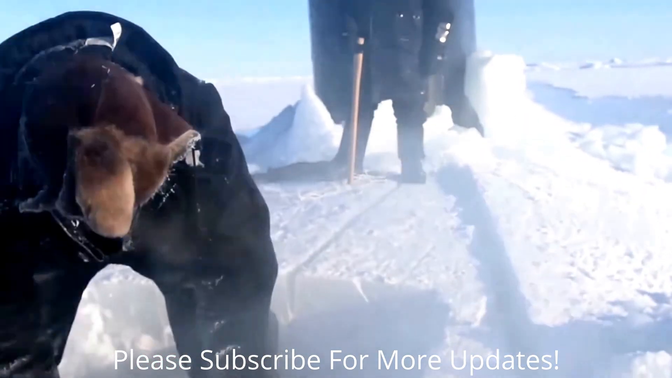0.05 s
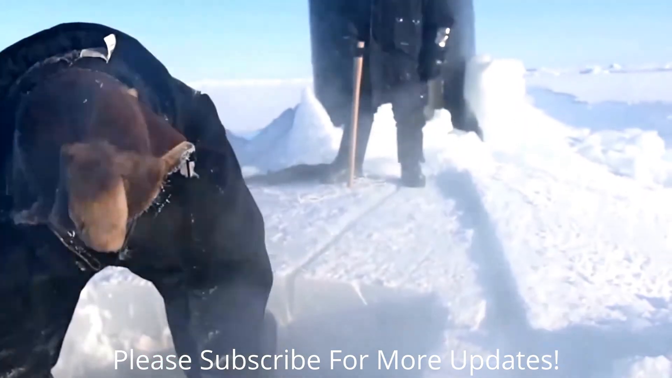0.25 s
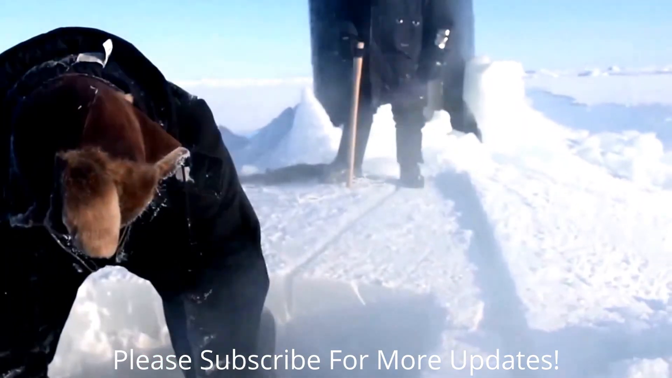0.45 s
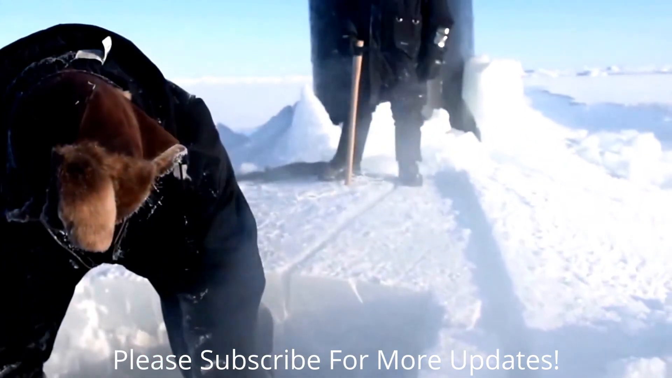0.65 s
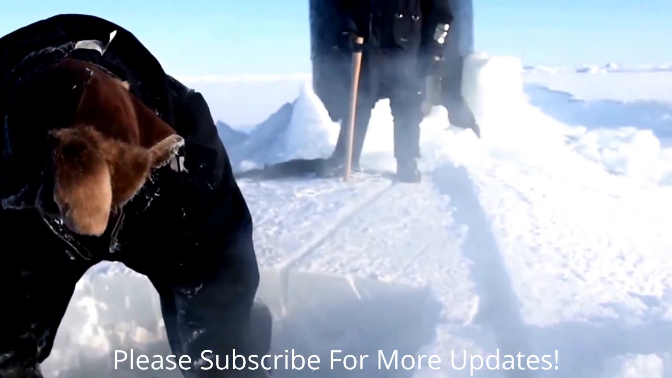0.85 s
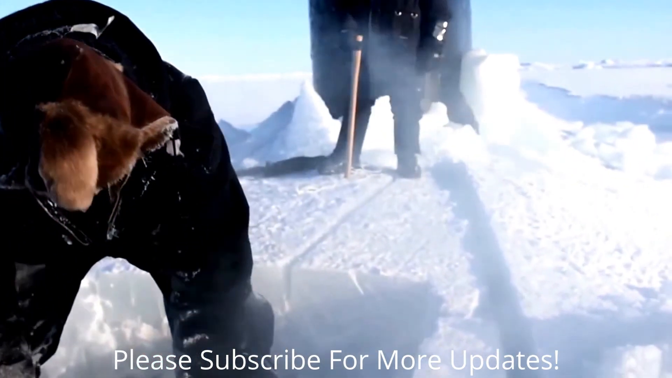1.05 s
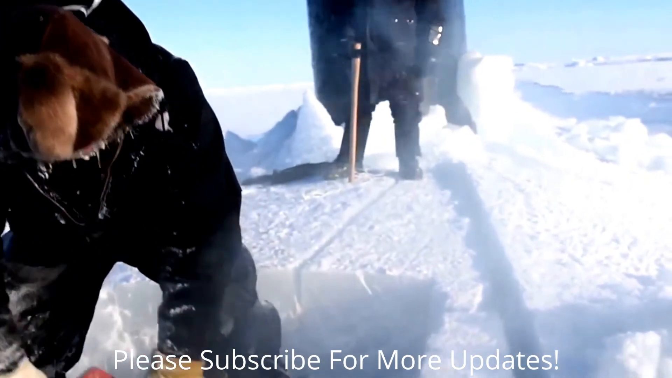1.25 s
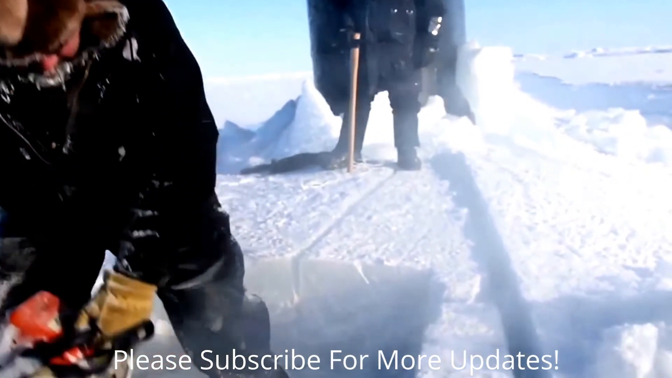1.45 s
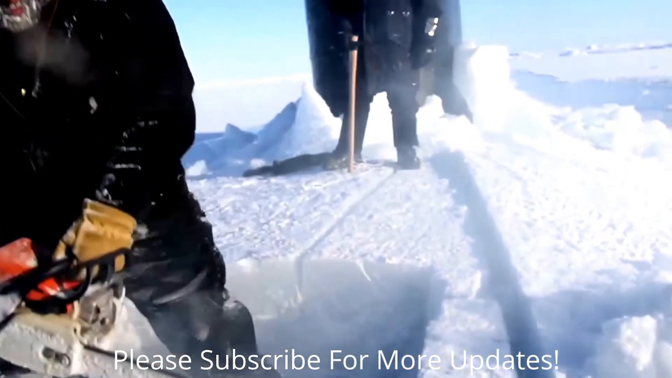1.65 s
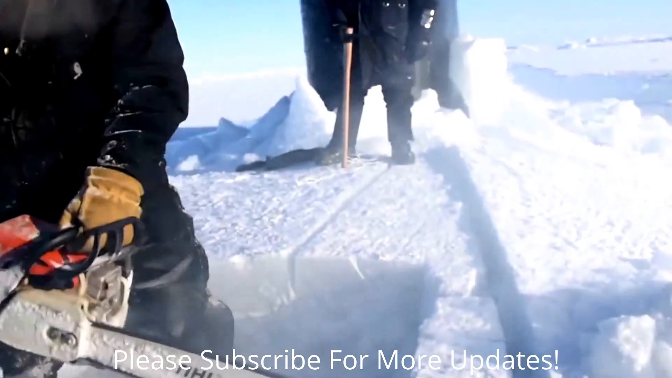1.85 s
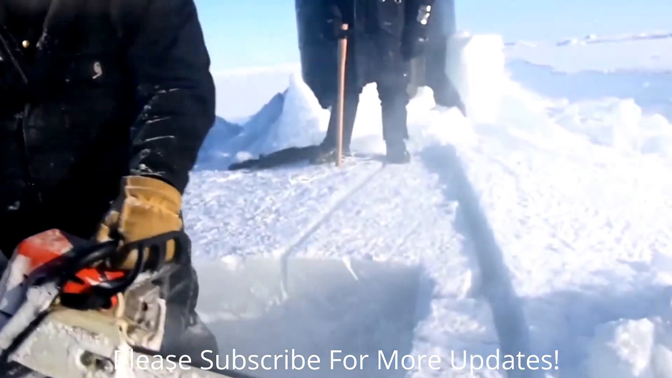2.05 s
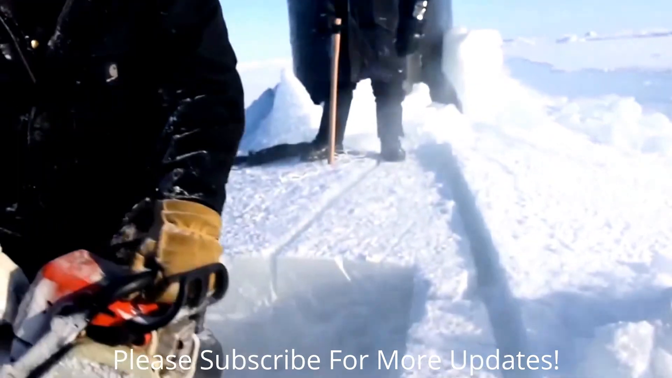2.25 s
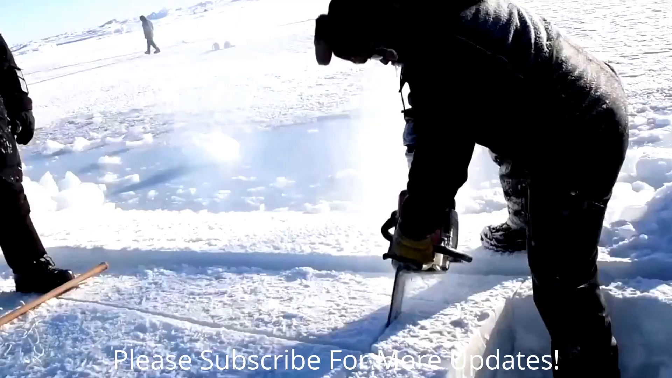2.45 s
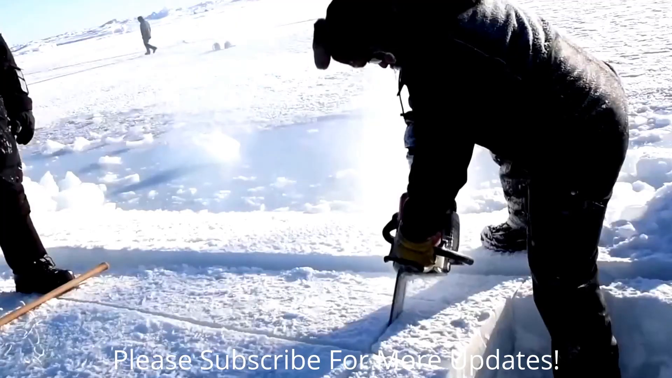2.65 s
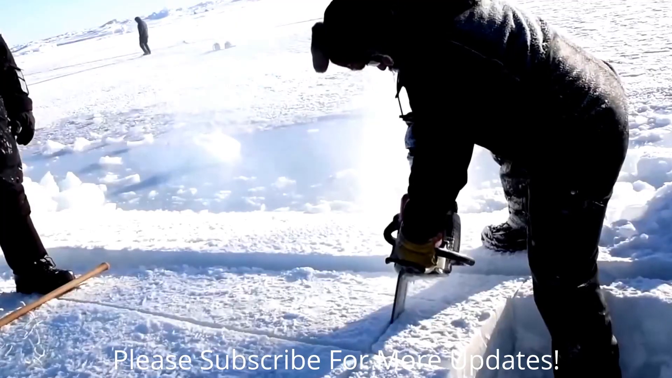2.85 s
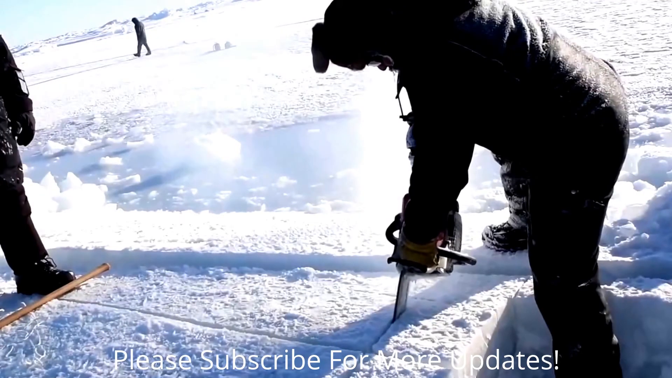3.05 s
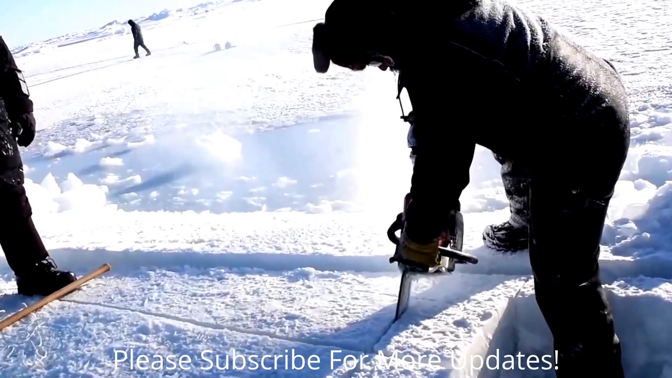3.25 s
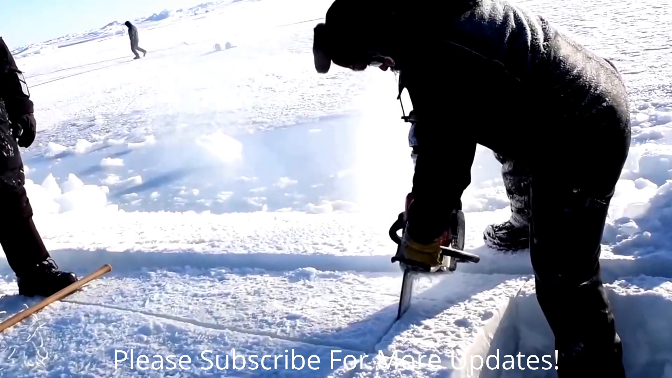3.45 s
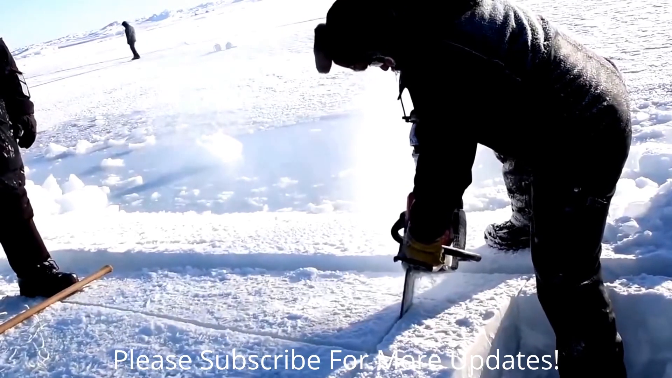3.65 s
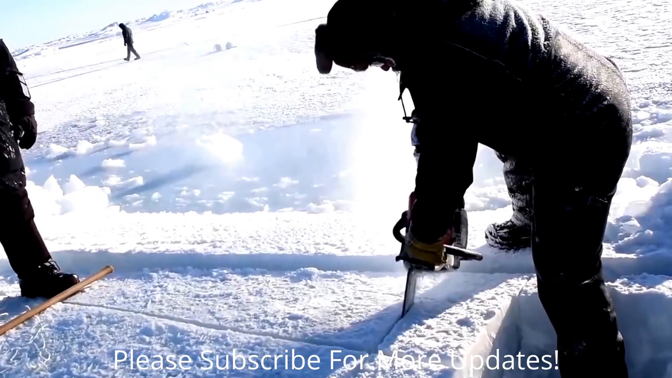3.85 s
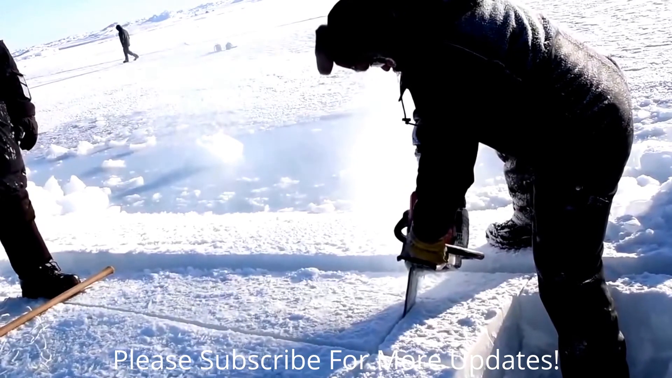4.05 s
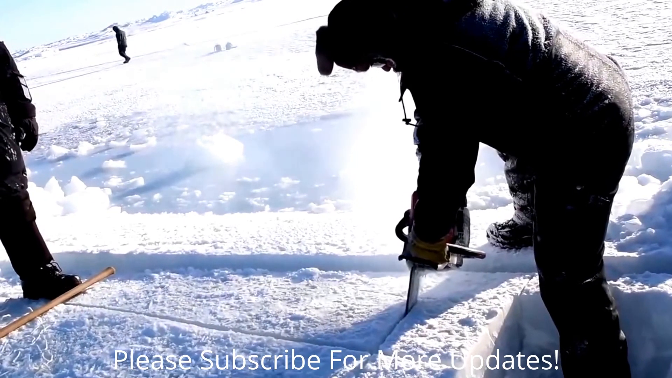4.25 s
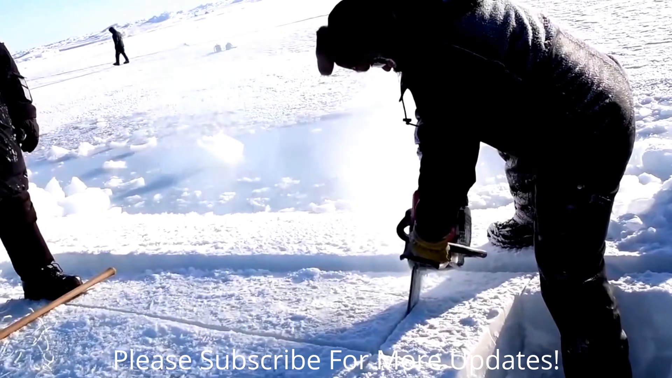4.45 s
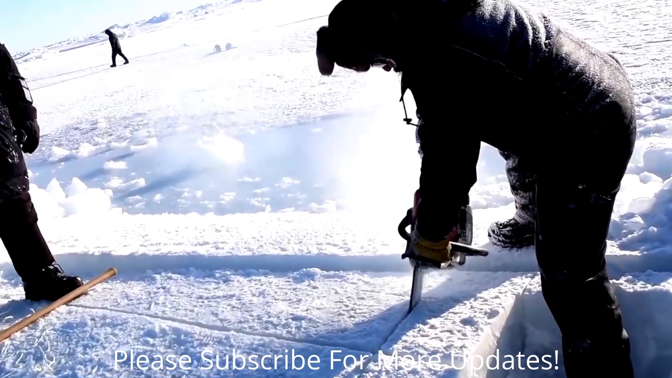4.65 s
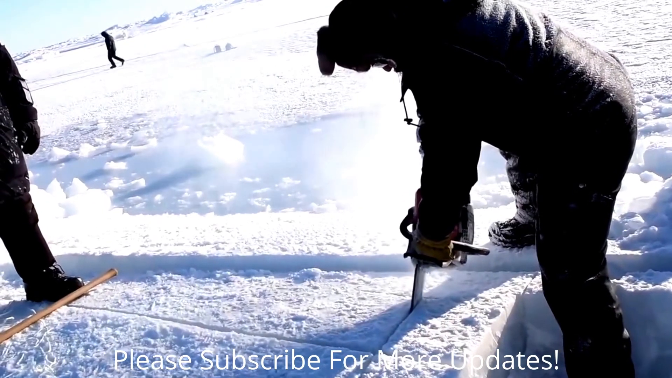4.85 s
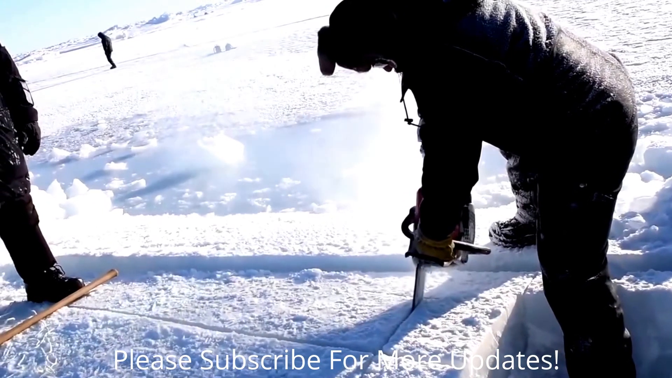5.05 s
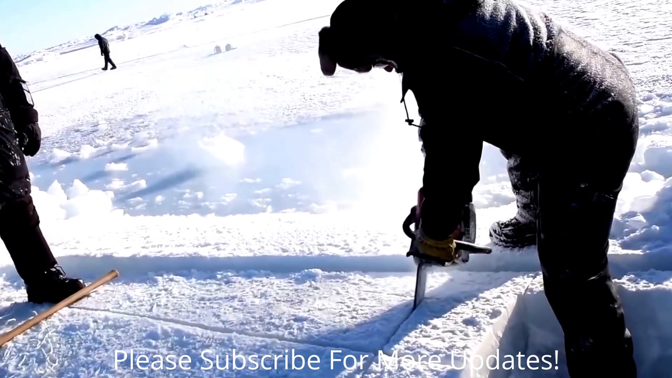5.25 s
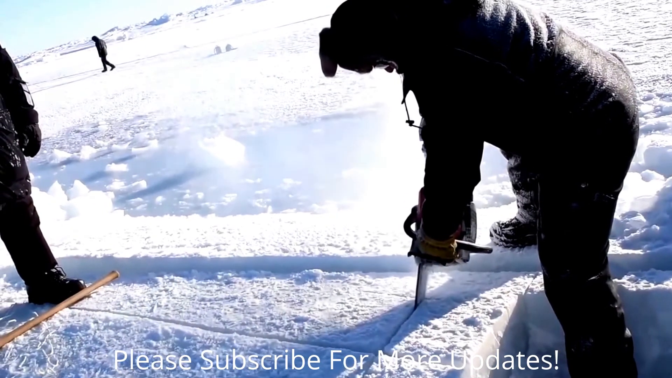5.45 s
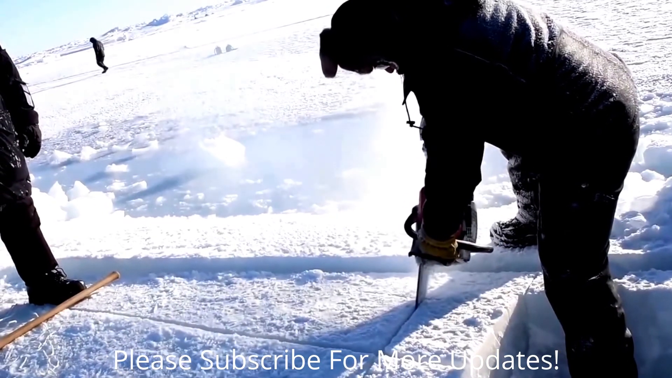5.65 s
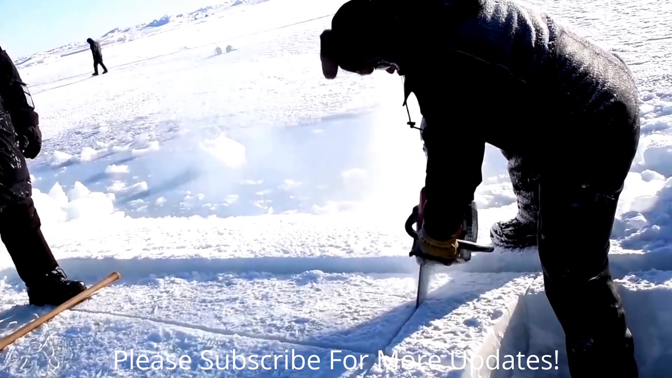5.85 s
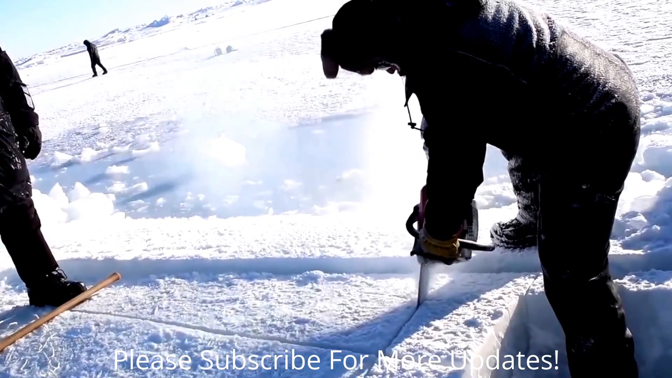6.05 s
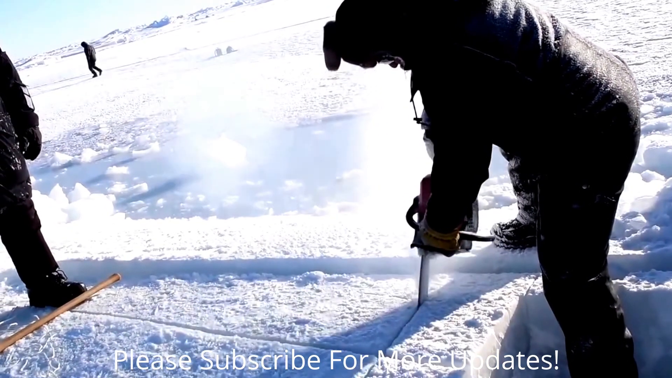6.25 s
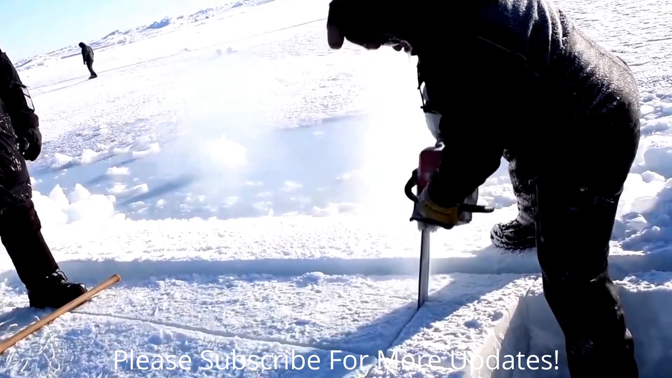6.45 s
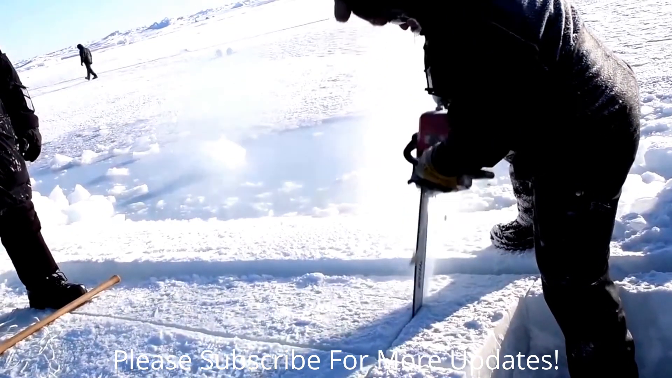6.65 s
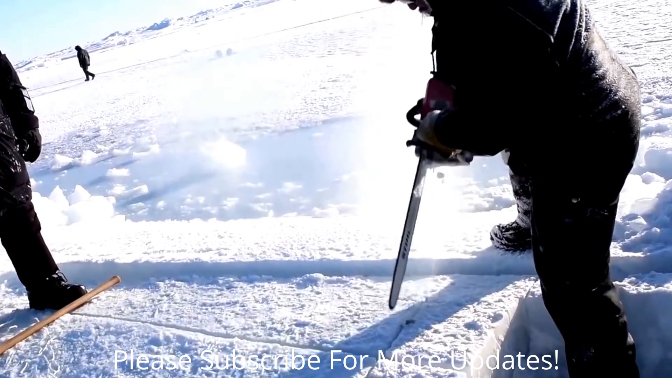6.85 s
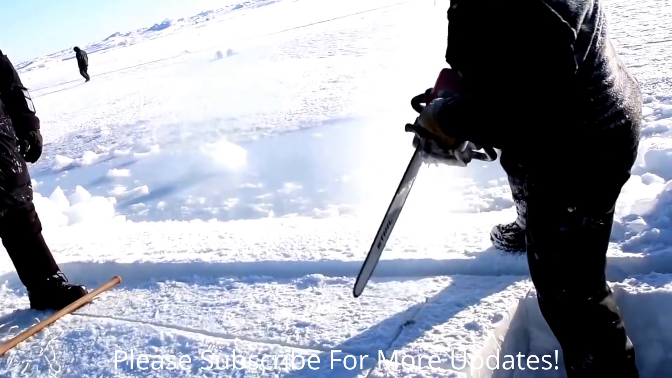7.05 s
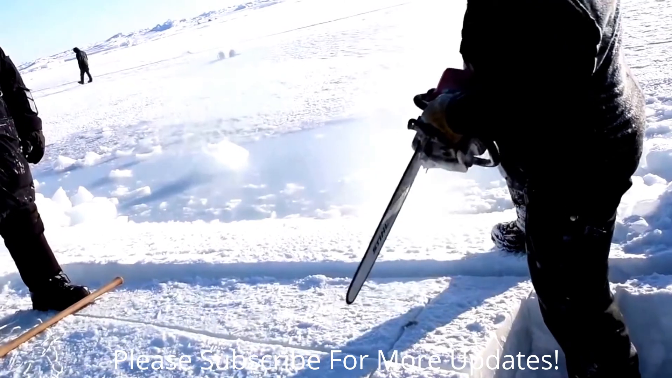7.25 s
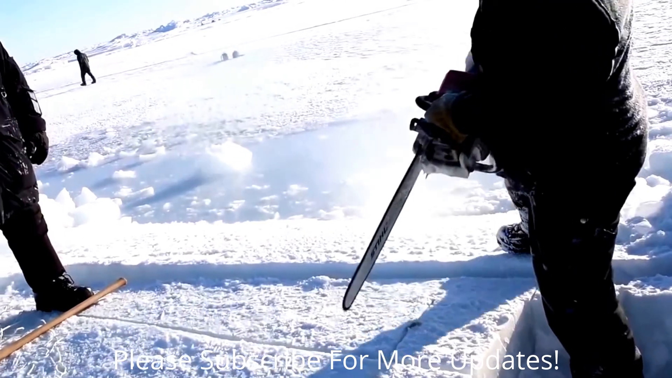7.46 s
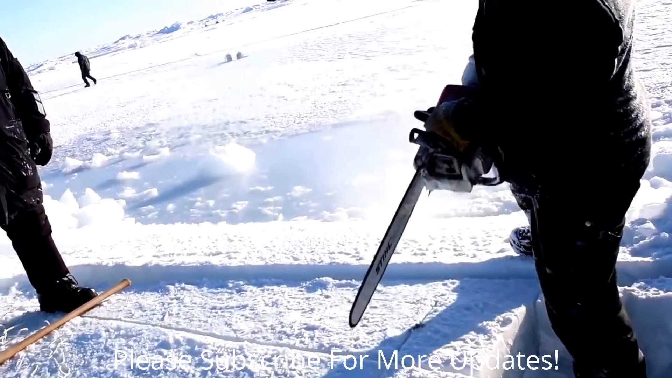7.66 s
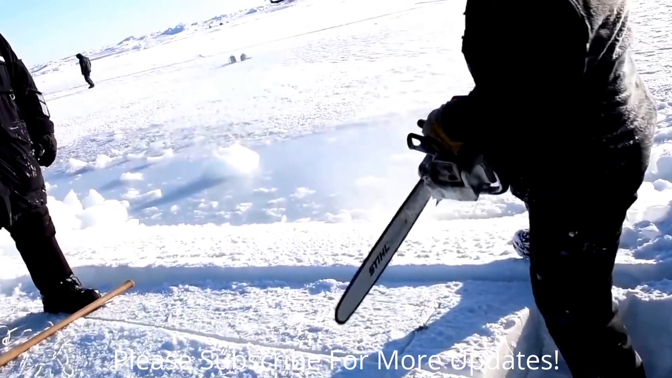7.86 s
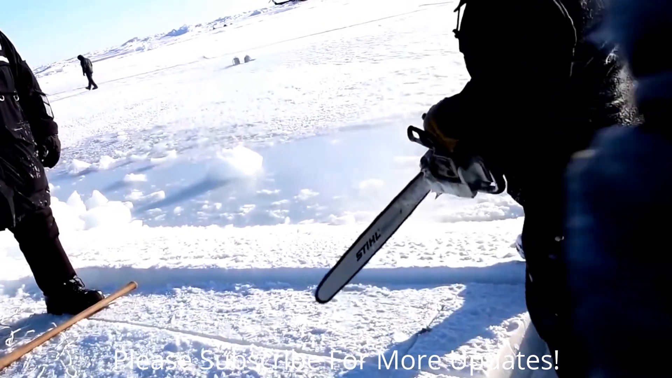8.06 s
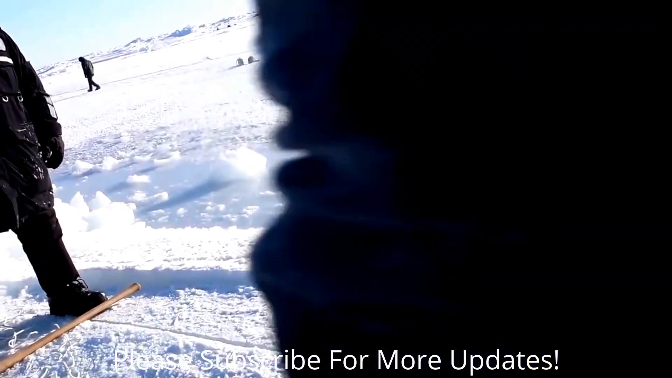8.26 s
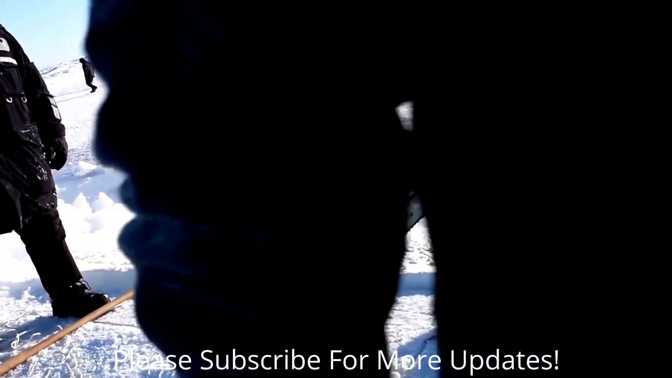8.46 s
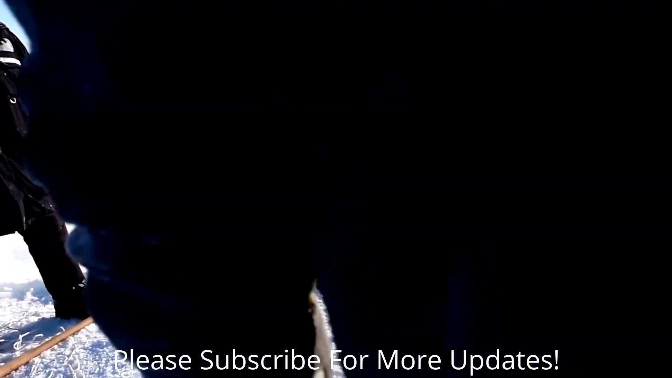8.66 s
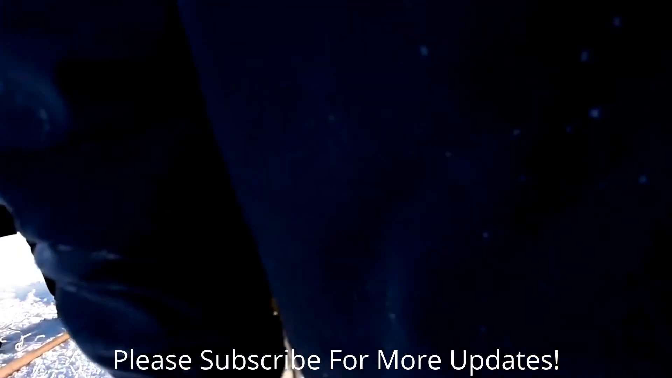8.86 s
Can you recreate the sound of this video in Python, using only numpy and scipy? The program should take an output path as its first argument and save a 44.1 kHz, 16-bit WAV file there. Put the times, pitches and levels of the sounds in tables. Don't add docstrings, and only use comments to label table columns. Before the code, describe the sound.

A chainsaw roars close by cutting ice, jumps slightly farther off, then lifts free, its whine falling to a rattling idle.

```python
import sys
import numpy as np
from scipy import signal
from scipy.fft import rfft, irfft, next_fast_len
from scipy.io import wavfile
from scipy.ndimage import uniform_filter1d

SR = 44100
rng = np.random.default_rng(int(sys.argv[2]) if len(sys.argv) > 2 else 0)


def amp(db):
    return 10 ** (np.asarray(db, float) / 20)


def write(x):
    x = np.atleast_2d(x).T
    wavfile.write(sys.argv[1], SR, np.round(np.clip(x, -1, 1) * 32767).astype(np.int16))


N = 392490

CUT_S, SHADED_S = 2.402, 8.08
SHUT_S, COAST_HZ, COAST_TAU_S, IDLE_HZ = 6.8, 188.7, 0.95, 55.5
SHUT_EXHAUST_DB, SHUT_FADE_S = -28, 0.16
WHINE_DB_PER_OCTAVE, WHINE_KNEE_HZ = 29, 127
FAN_DB, FAN_BLADES = -39.5, 24
KNOCK_S = 0.066
SELF_NOISE_DB, TOP_HZ = -98, 15180
# (close by [dB], further off [dB], shaded [dB])
TREBLE_DB, WHINE_DB = (-5.5, -7, -9), (-32.5, -36, -38)
EXHAUST_DB, BRIGHT_DB = (-73, -69, -70), (-0.5, -4, -2.5)
# start, two depths [s]; change at each depth [dB]
SINKS_S = (3.33, 5, 6)
DEEP_WHINE_DB, DEEP_EXHAUST_DB, DEEP_BRIGHT_DB = (4, 1), (2, 3), (-5, -4)

# (time [s], rate [Hz])
FREE_SPEED_HZ = [(0, 181.8), (.92, 190.2), (1.21, 194), (1.58, 194.2), (2.39, 188), (2.41, 176.4),
                 (2.95, 190.5), (4.09, 192.3), (5.32, 195), (6.22, 200.2), (6.44, 211.8)]
# (time [s], sag [Hz], half-width [s])
BITES_HZ = [(.14, 2.9, .103), (.57, 8, 0.16), (.96, 4.7, 0.068), (1.36, 1.07, 0.069), (1.96, 2.14, .13),
            (2.41, 4.2, 0.12), (2.65, 3.5, .13), (3.24, 8, 0.19), (3.69, 6.5, 0.13), (3.92, 5.2, .15),
            (4.27, 2.8, 0.076), (4.52, 3, .067), (4.63, 5, 0.12), (5.01, 1.34, 0.064), (5.37, 1.15, 0.077),
            (5.69, 3.3, 0.1238), (6.1, 1, .057)]
# (time [s], level [dB])
LOUDNESS_DB = [(0, -24.5), (.55, -25.5), (1.3, -24.5), (1.45, -23.5), (1.95, -23.5), (2.4, -25),
               (2.404, -27.5), (2.75, -29), (3.4, -28), (3.9, -28.5), (4.1, -28), (5.7, -27.5), (6.2, -28),
               (6.65, -26.5), (7.1, -28.5), (8.07, -29.5), (8.15, -30.5), (8.9, -33)]
# (frequency [Hz], level [dB])
MUFFLER_NEAR_DB = [(180, -60), (365, -33), (385, -26), (560, -12), (760, 2), (940, -18), (1130, 2),
                   (1500, 1.5), (1900, 22.5), (2600, -22)]
MUFFLER_FAR_DB = [(180, -38), (290, -25), (380, -32.5), (540, -14.5), (780, -11.5), (960, -6), (1250, 4),
                  (1400, 7), (1520, 14.5), (1720, 19), (1900, 12), (2100, 20), (2600, -6.5)]
# (multiple of firing rate [1], level [dB])
CUTTERS_NEAR_DB = [(3.5, -9), (7, -2)]
CUTTERS_FAR_DB = [(3.5, -19), (4, 5)]
# (multiple of firing rate [1], level [dB])
WHINE_LINES_NEAR_DB = [(14, -10), (15, -31), (16, -11.5), (17, -23), (18, -16), (18.5, -11), (19, -11),
                       (20, -29), (22, -4), (24, -27.5)]
WHINE_LINES_FAR_DB = [(13, -20), (14, -13), (15, -15), (16, -18), (17, -22), (18, -20), (19, -18),
                      (20, -21), (21, -13), (22, -21), (23, -15), (24, -12.5), (25, -19), (26, -14),
                      (27, -22), (28, -24)]
# (frequency [Hz], level [dB])
HOUSING_NEAR_DB = [(2000, -11.5), (2900, -7), (3200, 5), (3400, -5), (3700, -18), (5000, -4)]
HOUSING_FAR_DB = [(600, -60), (1200, -30), (2000, -12), (2600, -2), (3050, -2), (3200, 5), (3400, -1),
                  (4300, -1), (4600, 2), (5000, -1), (5600, -12)]
# (frequency [Hz], level [dB per Hz])
HISS_NEAR_DB = [(530, -81), (900, -43), (1220, -35), (1490, -23.5), (1930, -20.5), (2250, -10.5),
                (3210, -5.5), (3650, -4.5), (4410, -5), (11400, -12.5), (14300, -14), (15000, -18)]
HISS_FAR_DB = [(530, -73.5), (900, -41.5), (1280, -28.5), (1490, -22.5), (1870, -16.5), (2030, -6.5),
               (2820, -5), (3130, -1), (4260, -2.5), (4510, -2), (14100, -17), (15000, -21)]
HISS_IDLE_DB = [(300, -72), (600, -52), (1190, -30), (1570, -16), (1850, -15), (2080, -6), (2400, -8),
                (2900, -3), (3550, 1), (4100, -2), (4700, -2), (5600, -10), (13500, -20), (15000, -18)]
# two rows, corner times [s] and levels [dB]
LIFTED_DB = (6.1, 6.32, 6.68, 6.85), (-70, -40, -40, -60)
# (multiple of firing rate [1], level [dB])
FREE_CHAIN_DB = [(14, -5), (15, 0), (16, -6), (23, -8), (26, -3)]
# two rows, corner times [s] and levels [dB]
PUMPING_DB = (6.65, 6.8, 7.75, 8.1), (-110, -81, -82, -95)
# (frequency [Hz], level [dB])
COASTING_PIPE_DB = [(200, -45), (300, -29), (420, -18), (550, -11), (750, -4), (1000, 6), (1300, 14),
                    (1600, 20), (2200, 10)]
# two rows, corner times [s] and levels [dB]
SHOES_DRAG_DB = (7.1, 7.35, 7.75, 7.92, 8.1, 8.6), (-70, -42, -42, -35, -50, -72)
# (frequency [Hz], width [Hz], level [dB])
SHOES_DB = [(9200, 360, -2), (10300, 470, 2)]
# two rows, corner times [s] and levels [dB]
DRUM_FREE_DB = (7.9, 8.25, 8.7, 8.9), (-76, -46, -44, -51)
# (frequency [Hz], width [Hz], level [dB])
DRUM_DB = [(6710, 70, -2), (9040, 110, 0), (11800, 150, -1), (14900, 160, -8)]
# (time [s], level over ringing [dB])
DRUM_KNOCKS_DB = [
    (8.339, 4),
    (8.66, 3.5),
]
# (time [s], peak [dB])
RATTLES_DB = [
    (7.9443, -20),
    (8.071, -24.5),
    (8.1287, -29.5),
    (8.2575, -26),
    (8.5035, -18),
    (8.7407, -22.5),
]
# two rows, corner times [s] and levels [dB]
HUM_DB = (7.95, 8.15, 8.5, 8.9), (-110, -89, -86, -83)
# (frequency [Hz], width [Hz], level [dB])
AIR_BOX_DB = [(545, 27, -2), (480, 200, -16)]
# (frequency [Hz], level [dB])
BASS_CUT_DB = [(170, -55.5), (290, 0)]


def unit(x):
    return x / np.sqrt(np.mean(x ** 2))


def read(points, hz):
    points_hz, points_db = np.transpose(points)
    return np.interp(np.log(hz), np.log(points_hz), points_db)


def colour(x, points):
    size = next_fast_len(N + SR // 10)
    hz = np.arange(size // 2 + 1) * SR / size + 1
    return irfft(rfft(x, size) * amp(read(points, hz)), size)[:N]


def walk(rate_hz, step=1):
    hold = int(SR / rate_hz / step)
    n = N // step + 1
    levels = np.repeat(rng.standard_normal(n // hold + 1), hold)
    slewed = uniform_filter1d(uniform_filter1d(levels, hold), hold)
    return slewed[:n - (step == 1)]


def ring(x, modes):
    total = 0
    for hz, width_hz, db in modes:
        b, a = signal.iirpeak(min(hz, 0.45 * SR), hz / width_hz, SR)
        total = total + amp(db) * unit(signal.lfilter(b, a, x))
    return unit(total)


def partials(turns, hz, lines, shape, wander_db, rate_hz):
    step = 32
    total = 0
    for k, db in lines:
        level_db = db + read(shape, k * hz[::step]) + wander_db * walk(rate_hz, step)
        phase = (2 * np.pi * (k * turns % 1)).astype(np.float32)
        total = total + np.repeat(amp(level_db), step)[:N] * np.cos(phase)
    return total


def dips(t, rows):
    return sum(height * np.exp(-((t - s) / width_s) ** 2) for s, height, width_s in rows)


def speed(t):
    sag_hz = np.where(t < CUT_S, dips(t, BITES_HZ[:6]), dips(t, BITES_HZ[6:]))
    cutting_hz = np.interp(t, *np.transpose(FREE_SPEED_HZ)) - sag_hz
    coasting_hz = COAST_HZ * np.exp((SHUT_S - np.maximum(t, SHUT_S - 1)) / COAST_TAU_S)
    return ((cutting_hz ** -20. + coasting_hz ** -20.) ** -.5 + IDLE_HZ ** 10.) ** .1


def exhaust(turns, hz, muffler, cutters, bright_db):
    size = amp(0.7 * rng.standard_normal(int(turns[-1]) + 2))
    strength = np.interp(turns, np.arange(len(size)), size)
    lines = [(k, 0) for k in range(2, 13)] + cutters
    low_lines = [line for line in lines if line[0] < 5]
    high_lines = [line for line in lines if line[0] >= 5]
    low = partials(turns, hz, low_lines, muffler, wander_db=1.2, rate_hz=8)
    high = partials(turns, hz, high_lines, muffler, wander_db=4, rate_hz=6)
    return strength * (low + amp(bright_db) * high)


def whine(turns, hz, lines, housing):
    return partials(turns + 0.002 * walk(70), hz, lines, housing, wander_db=2.5, rate_hz=7)


def cycle_gate(turns):
    steady, scatter, second, choke = 0.38, 0.55, 0.5, 1.5
    half = 2 * turns
    size = 1 + scatter * (2 * rng.random(int(half[-1]) + 2) - 1)
    size[1::2] *= second
    puffs = size[half.astype(int)] * np.abs(np.sin(np.pi * half))
    return steady + np.tanh(choke * puffs)


def chips():
    density_hz, spread_db, burst_ms = 900, 0.73, 0.51
    hits = (rng.random(N) < density_hz / SR) * amp(spread_db * rng.exponential(size=N))
    burst = burst_ms * SR / 1000
    return uniform_filter1d(hits, int(burst)) * burst


def hiss(turns, hz, near, treble_db):
    flutter_db = 0.5 * walk(40) + 0.21 * walk(8)
    gate = (unit(cycle_gate(turns)) + 0.058 * unit(chips())) * amp(flutter_db)
    raw = unit(gate * rng.standard_normal(N))
    idle = np.clip((120 - hz) / 55, 0, 1)
    far_body = (1 - idle) * unit(colour(raw, HISS_FAR_DB)) + idle * unit(colour(raw, HISS_IDLE_DB))
    body = near * unit(colour(raw, HISS_NEAR_DB)) + (1 - near) * far_body
    low = colour(body, [(5500, 0), (9000, -30), (SR / 2, -60)])
    top = body - low
    top = top / np.sqrt(uniform_filter1d(top ** 2, SR // 4))
    return low + amp(treble_db + 1.44) * top


def lifted_chain(t, turns, hz):
    return amp(np.interp(t, *LIFTED_DB)) * whine(turns, hz, FREE_CHAIN_DB, HOUSING_FAR_DB)


def pumping(t, turns, hz):
    lines = [(k, 0) for k in range(3, 13)]
    pulses = partials(turns + 0.01 * walk(25), hz, lines, COASTING_PIPE_DB, wander_db=4, rate_hz=9)
    return amp(np.interp(t, *PUMPING_DB)) * pulses


def coasting_fan(turns, hz, shut):
    return shut * amp(FAN_DB + 3 * walk(16)) * whine(turns, hz, [(FAN_BLADES, 0)], HOUSING_FAR_DB)


def clutch_shoes(t, turns):
    scrape = rng.standard_normal(N) * (0.5 + np.exp(-(turns % 1) / 0.6))
    return amp(np.interp(t, *SHOES_DRAG_DB)) * ring(scrape, SHOES_DB)


def clutch_drum(t):
    harder_db = dips(t, [(s, db, KNOCK_S) for s, db in DRUM_KNOCKS_DB])
    size_db = 1.5 * rng.exponential(size=N) + 3 * walk(70)
    knocks = (rng.random(N) < 700 / SR) * amp(size_db) * rng.standard_normal(N)
    return amp(np.interp(t, *DRUM_FREE_DB) + harder_db) * ring(knocks, DRUM_DB)


def rattles(t):
    shape = dips(t, [(s, amp(db), 0.0059) for s, db in RATTLES_DB])
    noise = colour(rng.standard_normal(N), [(3000, -32), (8000, 5), (15000, 1)])
    return 0.17 * shape * unit(noise)


def air_box_hum(t):
    hum = ring(rng.standard_normal(N), AIR_BOX_DB)
    return amp(np.interp(t, *HUM_DB)) * colour(hum, [(700, 0.5), (1000, -30)])


def scene():
    t = np.arange(N) / SR
    hz = uniform_filter1d(speed(t), SR // 100)
    turns = np.cumsum(hz) / SR
    near = np.clip((CUT_S - t) * 150, 0, 1)
    shade = np.clip((t - SHADED_S) * 50, 0, 1)
    shut = np.clip((t - SHUT_S) / SHUT_FADE_S + 0.5, 0, 1)

    def place(db):
        return near * db[0] + (1 - near - shade) * db[1] + shade * db[2]

    def deep(db):
        return np.interp(t, SINKS_S, (0, *db)) * (1 - shut)

    bright_db = place(BRIGHT_DB) + deep(DEEP_BRIGHT_DB)
    exhaust_db = place(EXHAUST_DB) + deep(DEEP_EXHAUST_DB) + shut * SHUT_EXHAUST_DB + 1.5
    pipe = near * exhaust(turns, hz, MUFFLER_NEAR_DB, CUTTERS_NEAR_DB, bright_db)
    pipe = pipe + (1 - near) * exhaust(turns, hz, MUFFLER_FAR_DB, CUTTERS_FAR_DB, bright_db)

    whine_db = place(WHINE_DB) + deep(DEEP_WHINE_DB) + 9
    slowing_db = WHINE_DB_PER_OCTAVE * np.log2(np.minimum(hz / WHINE_KNEE_HZ, 1))
    lines = near * whine(turns, hz, WHINE_LINES_NEAR_DB, HOUSING_NEAR_DB)
    lines = lines + (1 - near) * whine(turns, hz, WHINE_LINES_FAR_DB, HOUSING_FAR_DB)
    singing = amp(whine_db) * lines + lifted_chain(t, turns, hz) + coasting_fan(turns, hz, shut)

    loudness = amp(np.interp(t, *np.transpose(LOUDNESS_DB)))
    saw = amp(exhaust_db) * pipe + amp(slowing_db) * singing
    saw = saw + loudness * hiss(turns, hz, near, place(TREBLE_DB))
    clutch = clutch_shoes(t, turns) + clutch_drum(t)
    mix = saw + pumping(t, turns, hz) + clutch + rattles(t) + air_box_hum(t)
    return np.tile(mix, (2, 1))


def band_limit(x):
    return signal.sosfilt(signal.butter(12, 15590, fs=SR, output="sos"), x)


def record(dry):
    heard = colour(dry[0], BASS_CUT_DB) + amp(SELF_NOISE_DB) * rng.standard_normal(N)
    heard = colour(heard, [(TOP_HZ - 100, 0), (TOP_HZ, -70), (SR / 2, -80)])
    heard = heard * np.clip(np.arange(N) / 12, 0, 1)
    return band_limit(np.tile(heard, (2, 1)))


dry = scene()
out = record(dry)
write(out)
```